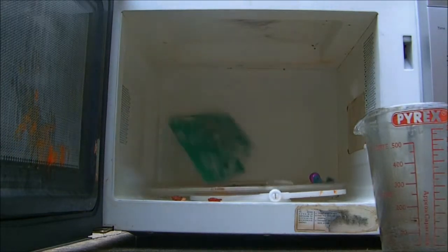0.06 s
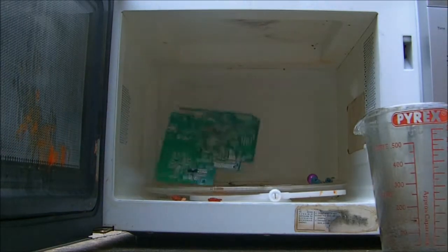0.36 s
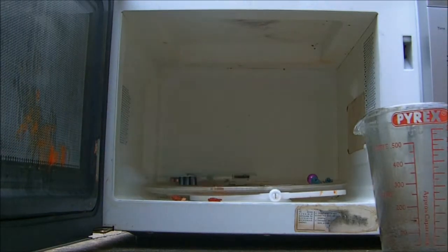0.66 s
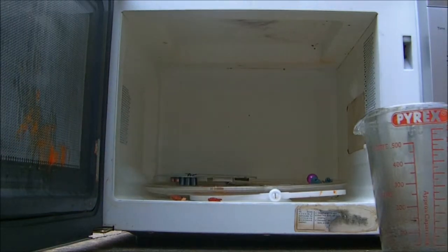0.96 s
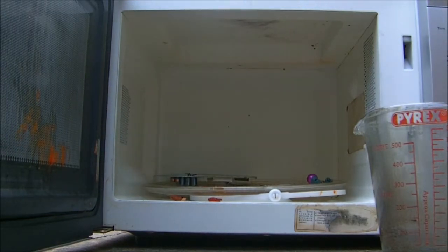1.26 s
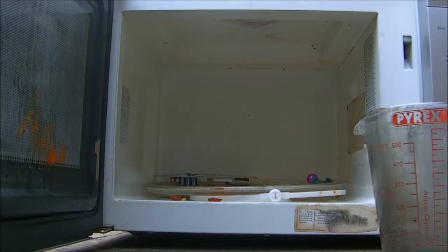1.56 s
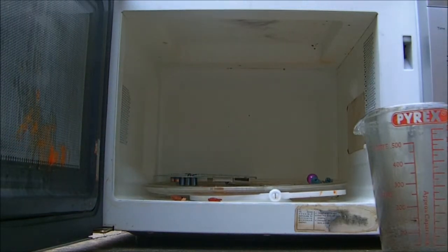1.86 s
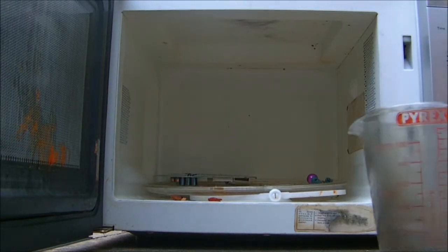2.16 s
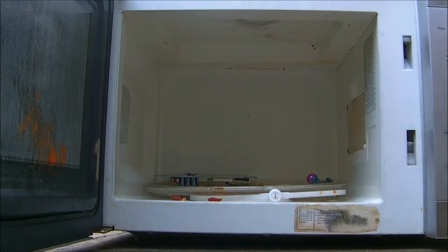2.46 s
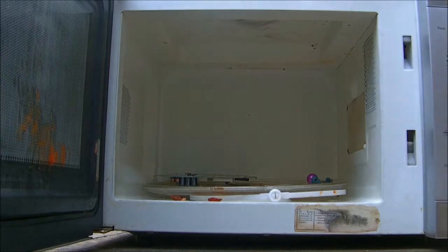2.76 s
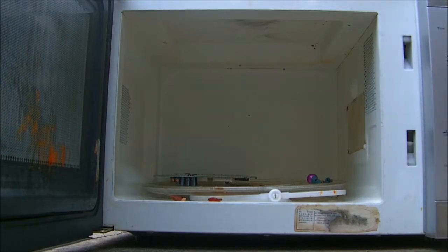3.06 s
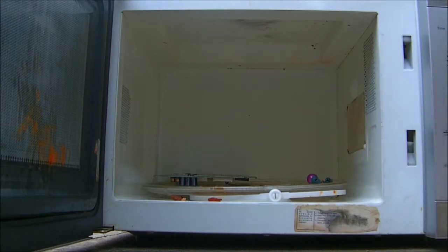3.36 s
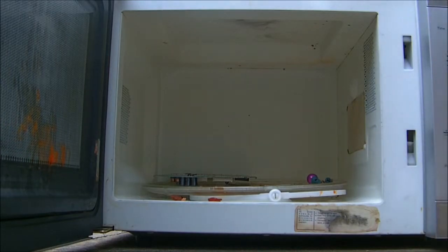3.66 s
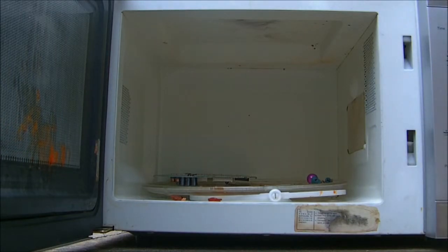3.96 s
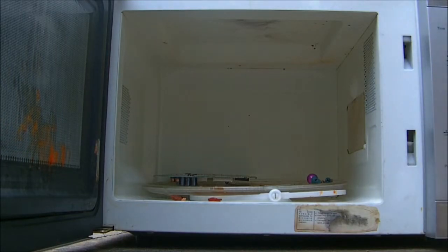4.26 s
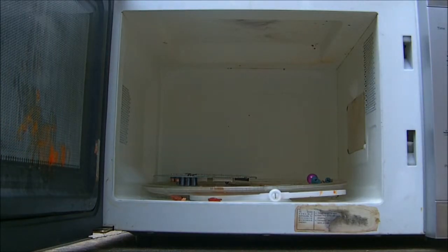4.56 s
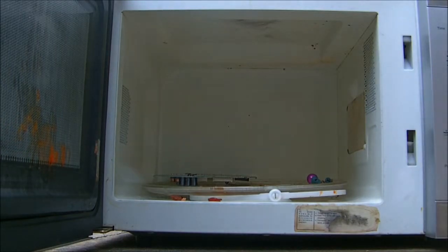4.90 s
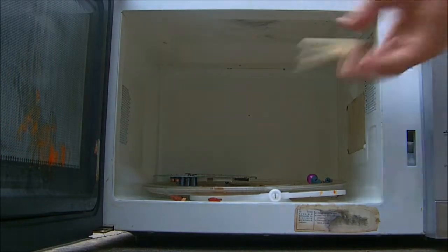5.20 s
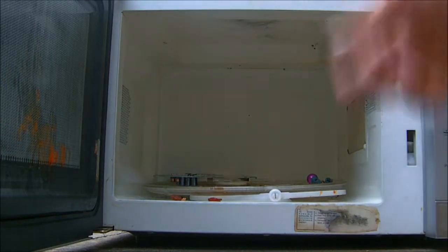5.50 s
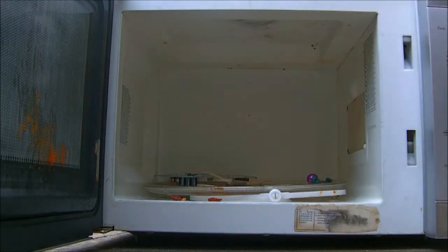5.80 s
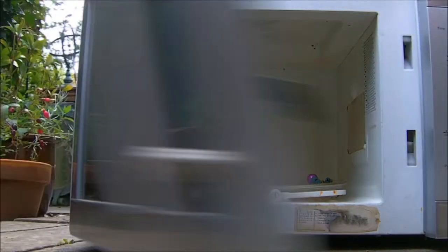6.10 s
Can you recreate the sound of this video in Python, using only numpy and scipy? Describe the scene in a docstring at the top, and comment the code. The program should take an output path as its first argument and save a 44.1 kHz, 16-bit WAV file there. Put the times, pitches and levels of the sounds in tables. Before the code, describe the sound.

A circuit board clatters onto a glass microwave turntable, a glass jug scrapes aside, then dry snaps and light clinks follow.

```python
"""Outdoors, at a bench with an open microwave oven. A circuit board is tossed in and clatters to rest
on the glass turntable, which rings, rattles and shakes the steel shell. A glass jug is dragged aside,
its foot sticking and slipping on the bench. Something dry rubs and snaps between fingers. A light
scrap is thrown in and skips over the glass, and the door rubs as it starts to swing. Quiet air behind."""
import sys
import numpy as np
from scipy import signal
from scipy.fft import rfft, irfft, next_fast_len
from scipy.io import wavfile
from scipy.ndimage import uniform_filter1d, map_coordinates

SR = 44100
rng = np.random.default_rng(int(sys.argv[2]) if len(sys.argv) > 2 else 0)


def generate_wav(signal):
    """Clip the signal to [-1, 1] and save it as 16-bit WAV at the path in sys.argv[1]."""
    frames = np.transpose(np.atleast_2d(signal))
    scaled = np.clip(frames, -1, 1) * 32767
    pcm = np.round(scaled).astype(np.int16)
    wavfile.write(sys.argv[1], SR, pcm)


N = 270774
TIME_S = np.arange(N) / SR
AGE_S = np.arange(SR * 3 // 5) / SR  # time since a contact

# Board landings. Each row: start in seconds, knock in dB, crack and clatter in dB re knock,
# ring in dB, pitch favoured by the contact point in Hz.
BOARD_LANDINGS = [(0, -7.5, -26, 2, -23.5, 1023), (.016, -8, -21, 2.5, -18.5, 2046),
                  (.062, -4.5, -13, -3, -26, 2046), (.108, -14.5, -25, -10.5, -26.5, 1541),
                  (.178, -6.5, -19, 1, -15.5, 1373), (.279, 1.5, -23.5, -5.5, -21, 2677),
                  (0.286, -21, -10.5, -4.5, -30, 4393), (.4, -44.5, -1.5, -1.5, -38, 5600),
                  (.494, -3, -15, 0, -12.5, 3230), (.518, -14, -14, -0.5, -15, 3240),
                  (.539, -21, -3, -1, -17, 1541), (.599, -18, -10, 3.5, -36, 2046),
                  (.615, -16.5, -15, 0, -33.5, 1373), (.692, -23.5, -25.5, -2.5, -46.5, 4020),
                  (0.727, -18, -28.5, -4.5, -58, 1541)]
# Turntable tipping. Each row: start in seconds, level in dB.
TRAY_ROCKS = [(0, -29.5), (.49, -43)]
# Jug drag force and ring per catch. Each row: time in seconds, level in dB.
DRAG_FORCE = [(2.03, -41.5), (2.085, -32.5), (2.135, -43.5), (2.25, -24.5), (2.44, -19), (2.649, -22.5),
              (2.759, -20.5), (2.841, -47)]
JUG_RING_LEVEL = [(2.03, -57), (2.14, -85), (2.25, -55), (2.56, -56.5), (2.77, -62.5), (2.84, -87)]
# Hardest catches of the jug's foot. Each row: start in seconds, force in dB.
HARD_CATCHES = [(2.211, -19.5), (2.328, -16), (2.402, -15), (2.413, -16), (2.469, -15), (2.487, -15),
                (2.501, -10), (2.516, -28.5), (2.532, -9.5), (2.563, -11), (2.584, -19.5), (2.605, -14.5),
                (2.627, -11.5), (2.643, -17.5), (2.696, -20.5), (2.71, -19.5), (2.866, -20.5)]
# Finger strokes. Each row: centre in seconds, length in seconds, level in dB, relative crackle in dB.
FINGER_STROKES = [(3.234, 0.039, -47.5, -13), (3.358, 0.15, -43, -12.5), (3.619, 0.05, -49, -5.5),
                  (3.684, 0.162, -51.5, -5.5), (3.856, 0.095, -41, -26), (4.12, 0.18, -36, -10.5),
                  (4.294, 0.2, -42.5, -13), (4.607, 0.21, -35.5, -15.5), (4.779, 0.096, -41, -14.5)]
# Snaps of the held thing. Each row: start in seconds, level in dB, relative crispness in dB, pitch in Hz.
DRY_SNAPS = [(3.362, -25, -5.5, 1370), (3.721, -27.5, -8, 1083), (4.013, -11, -5, 1690),
             (4.103, -18.5, -6, 1430), (4.31, -26.5, -8.5, 1570), (4.524, -27, -22, 1250),
             (4.621, -9, -14.5, 1007), (4.629, -12.5, -7.5, 1264), (4.639, -23, -6, 780)]
# Scrap skips. Each row: start in seconds, level in dB, relative knock in dB, favoured pitch in Hz.
SCRAP_SKIPS = [(5.338, -24.5, -10, 9265), (5.347, -23, -6, 6300), (5.371, -39.5, -7, 11400),
               (5.477, -32, -10.5, 4393), (5.508, -33.5, 2.5, 9265), (5.554, -40, -3, 8500),
               (5.59, -37.5, -3.5, 2770), (5.617, -55.5, 24, 3200), (5.644, -39.5, -1, 6300),
               (5.699, -51, 13, 2770)]
# Door rub and outdoor air. Each row: time in seconds, level in dB.
DOOR_LEVEL = [(5.69, -57.5), (5.745, -41), (5.8, -49), (5.92, -55.5), (6.14, -67.5)]
AIR_LEVEL = [(0, -63), (1.2, -65), (3.1, -59), (6.2, -59.5)]
# Case bumps and settling taps. Each row: start in seconds, level in dB.
CASE_BUMPS = [(5.842, -32.5), (6.014, -42)]
SETTLING_TAPS = [(.908, -55), (1.029, -61), (1.205, -55.5), (1.713, -55), (1.932, -47.5), (3.043, -62)]

# Struck modes; the turntable has a low knock (TRAY) and a high ring (GLASS).
# Each row: frequency in Hz, level in dB, T60 in seconds.
TRAY_MODES = [(720, -6.5, 0.033), (739.5, 5, 0.13), (869, -3.5, 0.13), (1048, -16.5, 0.37)]
GLASS_MODES = [(1541, 0, 0.3), (2046, -1, 0.3), (2677, -1.5, 0.24), (4020, -5, 0.2), (4393, -1, 0.14),
               (5600, -6, .12), (6300, 1, .14), (7350, -6, 0.1), (8500, -3, .07), (9265, 0, 0.09),
               (11400, -7, .09), (13630, -10, .09)]
BOARD_MODES = [(1023, -3, .13), (1288, -8, 0.28), (1373, 5, 0.12), (3160, -1, .07), (3230, -3, .06),
               (3290, -4, .05), (4479, -9, .15)]
JUG_MODES = [(1413, 9.5, 0.55), (1495, 0, 1.1), (1978, -4.5, 1.1), (3502, -6, 0.3), (3935, -17, .25),
             (4823, -7, 0.35), (5373, -16, 0.2), (6729, 8.5, 0.055), (8210, -9, 0.08), (8603, -18, .2),
             (10083, 3, 0.092), (10277, -5, 0.12), (10621, -10, 0.2), (11725, -7, 0.1), (11902, -9, .1),
             (12260, -5, 0.11)]
SCRAP_MODES = [(2770, 9, .06), (3200, 7, .05), (8560, 0, .03)]
# Body resonances. Each row: centre in Hz, bandwidth in Hz, gain in dB.
SHELL_BODY = [(151, 5, -2), (215.5, 6, 1), (296, 9, -2)]
BENCH_BODY = [(444, 39, -10.5), (555, 110, -8), (745, 87, 4.5), (822.4, 130, -0.5)]
HELD_BODY = [(786, 130, -3), (1288, 67, 3), (1483, 54, -2), (1790, 76, 0), (2425, 44, -6.5)]
# Spectra of contacts, rubbing and air. Each row: frequency in Hz, relative density in dB.
RATTLE_SPECTRUM = [(130, -35), (250, -8.5), (620, -3.5), (715, 4.5), (815, -3), (935, -6.5), (3600, -31),
                   (15000, -55)]
CLACK_SPECTRUM = [(30, -31), (120, -30.5), (400, -22), (750, 6.5), (1100, 2), (2000, -0.5), (4200, -21),
                  (8000, -33.5), (15000, -38)]
CRACK_SPECTRUM = [(500, -18.5), (3000, 9), (5000, -1), (9000, -7.5), (15000, -16)]
RIM_SPECTRUM = [(300, 0), (900, 5.5), (2050, 1.5), (2900, -13.5), (4500, -22.5), (14000, -40.5)]
RUB_SPECTRUM = [(160, -35), (750, -4.5), (1350, 3), (2750, -11.5), (8500, -26.5), (15000, -46.5)]
SNAP_SPECTRUM = [(130, -42), (350, -6.5), (550, -7.5), (800, 1), (1700, -2.5), (8000, -24), (15000, -43.5)]
TICK_SPECTRUM = [(1500, -17.5), (3000, 10), (5000, -2.5), (8600, -2), (13500, -2.5), (15000, -11)]
DOOR_SPECTRUM = [(120, -51.5), (314, -1), (750, 0), (1230, -7.5), (1800, 0.5), (2500, -10), (5000, -25),
                 (14000, -40)]
AIR_SPECTRUM = [(25, -27), (60, -19.5), (250, 1.5), (850, 4), (1700, -5.5), (2400, -17.5), (15000, -41.5)]
# Stereo width. Each row: frequency in Hz, side re mid in dB.
STEREO_WIDTH = [(600, -28.5), (1300, -22.5), (2700, -16.5), (10000, -9)]
# Stereo balance. Each row: frequency in Hz, left re right in dB.
STEREO_BALANCE = [(1400, .5), (2800, 1.1), (11000, 3)]


def board():
    """Each landing knocks the tray, flexes the board and rings the glass; the tray rattles and rocks."""
    far_edge_s, far_edge_db, choke_db_per_landing = 0.015, -15, 2.5
    out, rattle_power = np.zeros((2, N))
    starts_s = np.transpose(BOARD_LANDINGS)[0]
    for start_s, db, crack_db, clatter_db, ring_db, pitch_hz in BOARD_LANDINGS:
        for delay_s, edge_db in [(0, 0), (far_edge_s, far_edge_db)]:
            knock = amp(-11.5) * ring(TRAY_MODES, scatter_db=0)
            clatter = amp(-9) * burst(CLACK_SPECTRUM, t60_s=0.11)
            clatter += amp(-24) * ring(BOARD_MODES, scatter_db=2)
            crack = amp(crack_db) * burst(CRACK_SPECTRUM, t60_s=0.04)
            add(out, start_s + delay_s, amp(db + edge_db) * (knock + amp(clatter_db) * clatter + crack))
        later_landings = np.searchsorted(starts_s[starts_s > start_s], start_s + AGE_S)
        choke = uniform_filter1d(amp(-choke_db_per_landing * later_landings), size=200)
        ringing = ring(favoured(BOARD_MODES + GLASS_MODES, pitch_hz), scatter_db=3, waver=0.2)
        add(out, start_s, amp(ring_db) * choke * ringing)
        shake = amp(db + clatter_db - 13.5) * decay(0.31) * rise(0.0089)
        add(rattle_power, start_s, shake ** 2)
    return out + turntable(rattle_power)


def turntable(rattle_power):
    """The tray rattles on its rollers, chatters against the board and rocks the steel shell."""
    rock_peak_s = 0.071
    rocking = np.zeros(N)
    for start_s, db in TRAY_ROCKS:
        add(rocking, start_s, amp(db) * AGE_S / rock_peak_s * np.exp(1 - AGE_S / rock_peak_s))
    force = np.sqrt(rattle_power + (amp(9.5) * rocking) ** 2)
    rollers = force * friction(RATTLE_SPECTRUM, rate_hz=380, spread_db=6, hiss=0.34)
    cavity = echo(rollers, t60_s=0.18)
    ringing = ring(BOARD_MODES + GLASS_MODES[:2], scatter_db=-1, tilt_db_per_octave=-10.5)
    chatter = excite(ringing, force * slips(rate_hz=300, spread_db=4.5))
    shell = rocking * unit(resonate(noise(), SHELL_BODY))
    return amp(-4) * rollers + amp(-3) * cavity + amp(-11.5) * chatter + shell


def jug():
    """Each catch of the foot thuds on another spot of the bench, bites with the rim and rings the glass."""
    full_force_db, deepest_bite_s, bite_fade_db_per_s = -3, 2.53, 30
    swell_db, swell_hz = 3.5, 4.1  # each mode swells as the foot turns
    thuds, rim, glass = np.zeros((3, N))
    push = np.pad(np.hanning(SR // 1000), (0, SR // 10))
    swell_phases = rng.random(len(JUG_MODES))
    for start_s, db in stick_slip():
        shift = 1 + 0.03 * rng.standard_normal()
        spot = [(hz * shift, width_hz, gain_db + 1.5 * rng.standard_normal())
                for hz, width_hz, gain_db in BENCH_BODY]
        add(thuds, start_s, amp(db + 13) * resonate(push, spot))
        bite_db = -7 + 1.18 * (db - full_force_db) - bite_fade_db_per_s * abs(start_s - deepest_bite_s)
        add(rim, start_s, amp(bite_db) * burst(RIM_SPECTRUM, t60_s=0.016, attack_s=0.001))
        modes = np.array(JUG_MODES)
        modes[:, 1] += swell_db * np.sin(2 * np.pi * (swell_hz * start_s + swell_phases))
        accent_db = 0.4 * (db - np.interp(start_s, *np.transpose(DRAG_FORCE)))
        ring_db = np.interp(start_s, *np.transpose(JUG_RING_LEVEL)) + accent_db - 1
        add(glass, start_s, amp(ring_db) * ring(modes, scatter_db=4))
    add(glass, 2.795, amp(-51) * ring(favoured(JUG_MODES, 3502), scatter_db=0))  # foot lifts, rings out
    for start_s, db in HARD_CATCHES:
        crack_db = -26 + 4.5 * (db - full_force_db)
        add(rim, start_s + 0.001, amp(crack_db) * burst(CRACK_SPECTRUM, t60_s=0.0044))
    add(rim, 1.95, amp(-33) * burst(RIM_SPECTRUM, t60_s=0.44, attack_s=0.127))  # opening scuff
    grit = envelope(DRAG_FORCE) * slips(rate_hz=800, spread_db=1.5)
    thuds += amp(1.5) * resonate(grit, BENCH_BODY)
    rim += amp(-18.5) * equalise(grit, RIM_SPECTRUM)
    scrape = thuds + highpass(rim, 400)
    return scrape + glass + amp(-7) * echo(scrape, t60_s=0.085)


def stick_slip():
    """The foot's catches as (seconds, dB): the hard ones, and an uneven run between them."""
    rate_hz, jitter_cycles, scatter_db = 73.6, 0.17, 3.5
    drag_s, force_db = np.transpose(DRAG_FORCE)
    count = int((drag_s[-1] - drag_s[0]) * rate_hz)
    timing, strength = rng.standard_normal((count, 2)).T
    starts_s = drag_s[0] + (np.arange(count) + jitter_cycles * timing) / rate_hz
    levels_db = np.interp(starts_s, drag_s, force_db) + scatter_db * strength
    gaps_s = np.abs(starts_s[:, None] - np.transpose(HARD_CATCHES)[0]).min(1)
    free = gaps_s > 1 / rate_hz
    return HARD_CATCHES + list(zip(starts_s[free], levels_db[free]))


def handling():
    """Something dry and hollow rubs, crackles and snaps between the fingers."""
    pressure, crackle_gain, hollow = np.zeros((3, N))
    grit = slips(rate_hz=400, spread_db=3)
    for centre_s, length_s, db, crackle_db in FINGER_STROKES:
        stroke = amp(db) * np.exp(-np.abs(2 * (TIME_S - centre_s) / length_s) ** 3)
        pressure += stroke
        span = slice(round((centre_s - length_s) * SR), round((centre_s + length_s) * SR))
        grip_shift = 1 + 0.1 * rng.standard_normal()
        body = [(hz * grip_shift, width_hz, gain_db) for hz, width_hz, gain_db in HELD_BODY]
        hollow[span] += stroke[span] * unit(resonate(grit[span], body))
        crackle_gain += amp(crackle_db) * stroke
    grip_db = 2 * coloured(noise(), [(50, 14), (120, -81)])  # the grip holds and gives
    rub = amp(-7) * coloured(grit + 0.8 * noise(), RUB_SPECTRUM)
    cracks = slips(rate_hz=260, spread_db=5.5)
    crackle = coloured(cracks, [(1000, -8), (2500, 4), (6500, -5.5), (15000, -34)])
    out = amp(grip_db) * (pressure * rub + amp(-5) * hollow + amp(-5.5) * crackle_gain * crackle)
    for start_s, db, crisp_db, hz in DRY_SNAPS:
        attack_s = 0.0015 * amp(-8 - crisp_db)  # dull snaps rise more slowly
        knock = amp(-12) * burst(SNAP_SPECTRUM, t60_s=0.059)
        tone = amp(-1.5) * ring([(hz, 0, 0.035)], scatter_db=1.5)
        crisp = amp(crisp_db - 5) * burst(CRACK_SPECTRUM[:-1] + [(15000, -30.5)], t60_s=0.028)
        add(out, start_s, amp(db) * (knock + tone + crisp) * rise(attack_s))
    return out + amp(-4) * echo(out, t60_s=0.023)


def scrap():
    """A light, hard scrap skips on the turntable and damps it; each edge and spot has its own pings."""
    out = np.zeros(N)
    damping = decay(0.22)
    for start_s, db, knock_db, pitch_hz in SCRAP_SKIPS:
        pings = [(hz, 0, 0.035) for hz in rng.uniform(2510, 14000, size=7)]
        tick = amp(-0.5) * burst(TICK_SPECTRUM, t60_s=0.021, attack_s=0.003)
        tick += amp(-19) * ring(pings, scatter_db=2)
        modes = favoured(SCRAP_MODES + GLASS_MODES[2:], pitch_hz)
        glass = amp(-10.5) * ring(modes, scatter_db=3) * damping
        knock = amp(-7) * ring(TRAY_MODES + [(2420, 0.5, 0.03)], scatter_db=-2) * damping
        knock += amp(-1.5) * burst(CLACK_SPECTRUM, t60_s=0.055, attack_s=0.0069)
        add(out, start_s, amp(db) * (tick + glass + amp(knock_db) * knock))
    add(out, 5.332, amp(-36) * burst(TICK_SPECTRUM, t60_s=0.06, attack_s=0.003))  # first edge brushes
    add(out, 5.345, amp(-40) * ring(GLASS_MODES[6:], scatter_db=-2))  # high rebound: glass rings freely
    return out + amp(-5.5) * echo(out, t60_s=0.107)


def oven():
    """The door rubs as it swings, the case bumps, and things settle with faint taps."""
    out = amp(-1.5) * envelope(DOOR_LEVEL) * coloured(noise(), DOOR_SPECTRUM)
    bump_spectrum = [(100, -61.5), (320, 19.5), (750, 0.5), (6000, -33.5)]
    for start_s, db in CASE_BUMPS:
        add(out, start_s, amp(db - 3) * burst(bump_spectrum, t60_s=0.1, attack_s=0.00111))
    for start_s, db in SETTLING_TAPS:
        add(out, start_s, amp(db) * burst(SNAP_SPECTRUM, t60_s=0.06, attack_s=0.0026))
    return out


def air():
    """Soft outdoor air: a centred wash and a separate faint hiss at each ear."""
    wash = envelope(AIR_LEVEL) * coloured(noise(), AIR_SPECTRUM)
    hiss = np.array([coloured(noise(), [(1000, 3), (15000, -10)]) for _ in range(2)])
    return wash + amp(-71) * hiss


def burst(spectrum, t60_s, attack_s=0.00025):
    """A contact's crowded short modes, as decaying coloured noise."""
    return coloured(noise(len(AGE_S)), spectrum) * decay(t60_s) * rise(attack_s)


def ring(modes, scatter_db, tilt_db_per_octave=0, waver=0, waver_hz=55):
    """Struck modes with scattered strengths; waver is loose contact shaking their level and phase."""
    hz, db, t60_s = np.transpose(modes)[:, :, None]
    strength = amp(db + scatter_db * noise(hz.shape) + tilt_db_per_octave * np.log2(hz / hz[0]))
    phase = 2 * np.pi * (hz * AGE_S + rng.random(hz.shape))
    wave = np.sin(phase)
    if waver:
        knots = noise((2, len(AGE_S) // 100))
        swell, drift = [map_coordinates(row, [AGE_S * waver_hz]) for row in knots]
        wave += waver * (swell * wave + drift * np.cos(phase))
    return (strength * decay(t60_s) * wave).sum(0) * rise(0.00096)


def favoured(modes, pitch_hz, octave_away_db=-21):
    """A contact point drives the modes near its pitch hardest."""
    return [(hz, db + octave_away_db * np.sqrt(abs(np.log2(hz / pitch_hz))), t60_s)
            for hz, db, t60_s in modes]


def friction(spectrum, rate_hz, spread_db, hiss):
    """Slips over a smooth hiss, coloured by what is rubbed; rms 1."""
    return coloured(slips(rate_hz, spread_db) + hiss * noise(), spectrum)


def slips(rate_hz, spread_db):
    """Tiny random slips of uneven size; rms 1."""
    impulses = (rng.random(N) < rate_hz / SR) * rng.choice([-1, 1], N)
    return unit(impulses * amp(spread_db * np.clip(noise(), -2, 2)))


def echo(x, t60_s):
    """Dense near reflections with about the energy of x."""
    return excite(noise(len(AGE_S)) * decay(t60_s) * rise(0.0059), x)


def excite(response, force):
    """Force through an impulse response scaled to unit energy."""
    return signal.fftconvolve(force, response / np.linalg.norm(response))[:N]


def resonate(x, body):
    """Parallel band-pass resonances of alternating sign."""
    return filtered(x, lambda hz: sum(
        (-1) ** k * amp(db) * 1j * hz * width_hz / (centre_hz ** 2 - hz ** 2 + 1j * hz * width_hz)
        for k, (centre_hz, width_hz, db) in enumerate(body)))


def filtered(x, response):
    """FFT filter; response maps Hz to gain."""
    size = x.shape[-1]
    padded = next_fast_len(size + 8192)
    return irfft(rfft(x, padded) * response(np.fft.rfftfreq(padded, 1 / SR)), padded)[..., :size]


def highpass(x, cutoff_hz):
    return signal.sosfilt(signal.butter(2, cutoff_hz, "highpass", fs=SR, output="sos"), x)


def equalise(x, spectrum):
    return filtered(x, lambda hz: amp(db_at(spectrum, hz)))


def coloured(x, spectrum):
    return unit(equalise(x, spectrum))


def db_at(spectrum, hz):
    points_hz, db = np.transpose(spectrum)
    return np.interp(np.log(hz + 1), np.log(points_hz + 1), db)


def envelope(points):
    return amp(np.interp(TIME_S, *np.transpose(points), left=-140, right=-140))


def decay(t60_s):
    return amp(-60 * AGE_S / t60_s)


def rise(attack_s):
    return 1 - np.exp(-AGE_S / attack_s)


def noise(shape=N):
    return rng.standard_normal(shape)


def amp(db):
    return 10 ** (np.asarray(db) / 20)


def unit(x):
    return x / np.sqrt(np.mean(x ** 2) + 1e-20)


def add(track, start_s, sound):
    start = max(round(start_s * SR), 0)
    part = track[start:start + len(sound)]
    part += sound[:len(part)]


def scene():
    """Sources just ahead, with little bass; near reflections widen the treble, which leans left."""
    mid = highpass(board() + jug() + handling() + scrap() + oven(), 110)
    side = equalise(echo(mid, t60_s=0.035), STEREO_WIDTH)
    pair = np.array([mid + side, mid - side])
    return filtered(pair, lambda hz: amp(np.outer([0.5, -0.5], db_at(STEREO_BALANCE, hz)))) + air()


def record(dry):
    """Soft overload on the loudest blows, then a band limit."""
    ceiling, top_hz = 0.45, 15500
    clipped = dry / (1 + np.abs(dry / ceiling) ** 6) ** (1 / 6)
    return filtered(clipped, lambda hz: hz < top_hz)


dry = scene()
out = record(dry)
generate_wav(out)
```